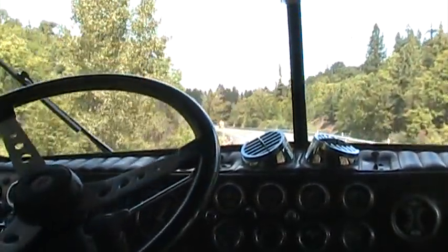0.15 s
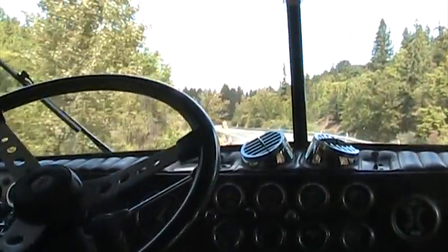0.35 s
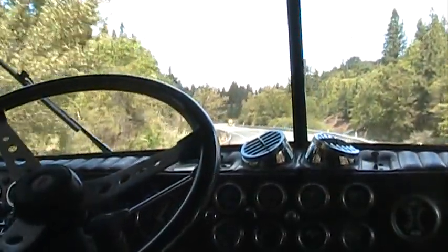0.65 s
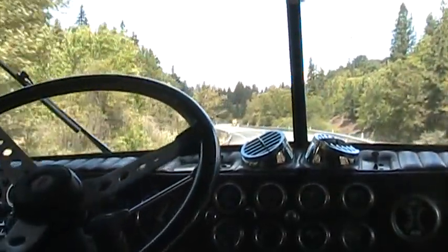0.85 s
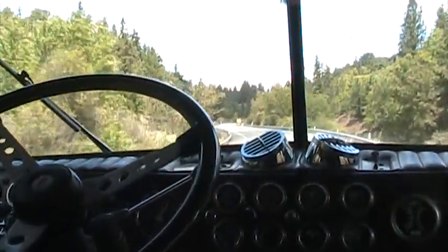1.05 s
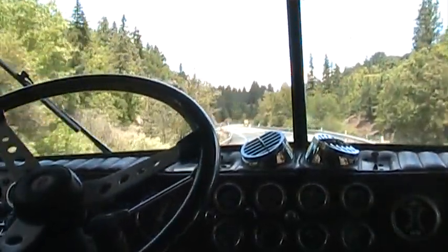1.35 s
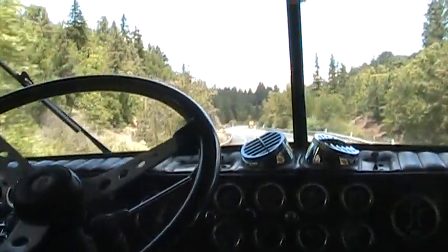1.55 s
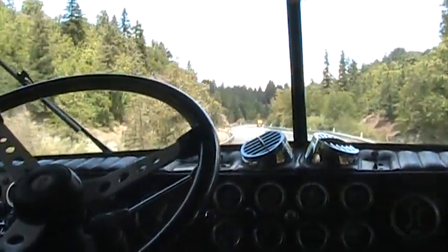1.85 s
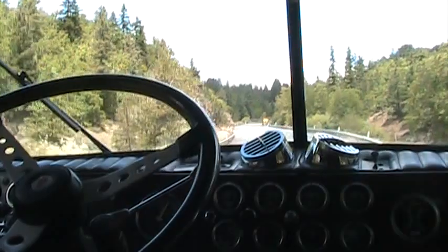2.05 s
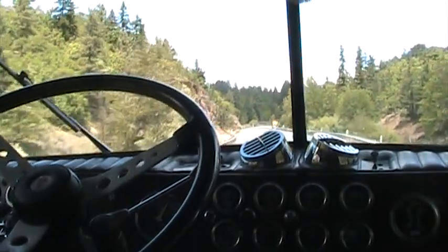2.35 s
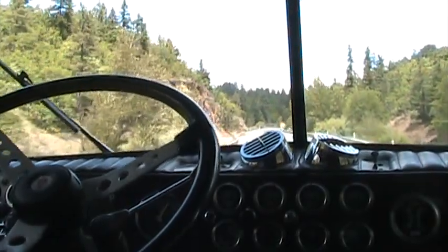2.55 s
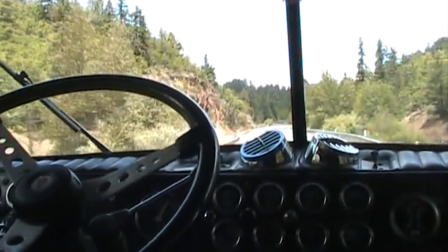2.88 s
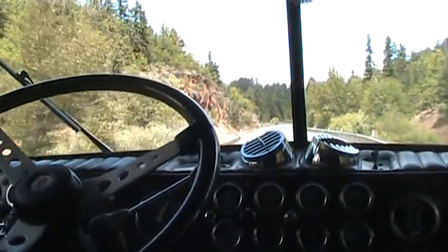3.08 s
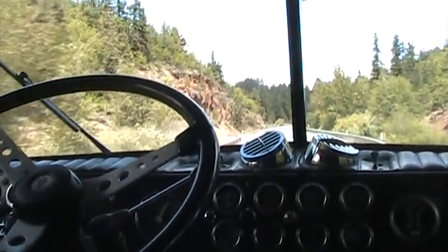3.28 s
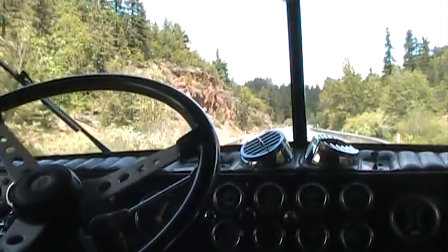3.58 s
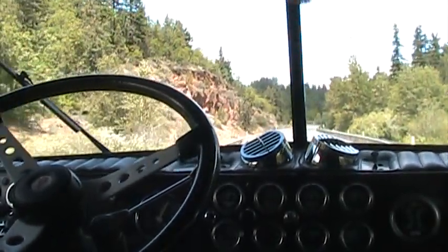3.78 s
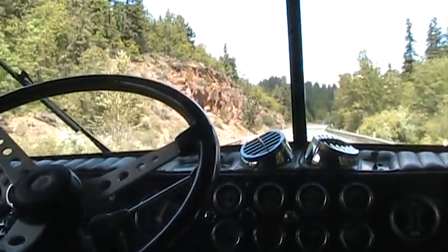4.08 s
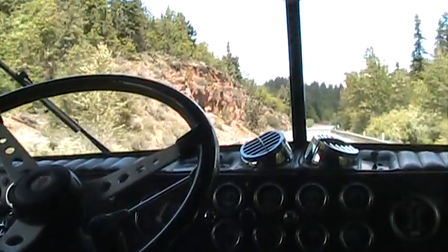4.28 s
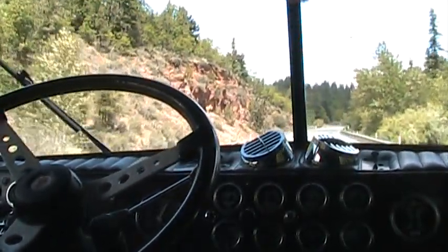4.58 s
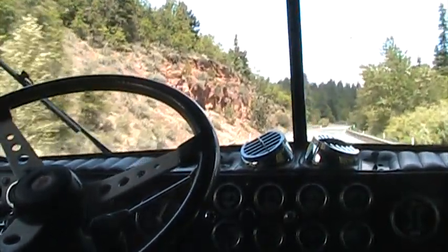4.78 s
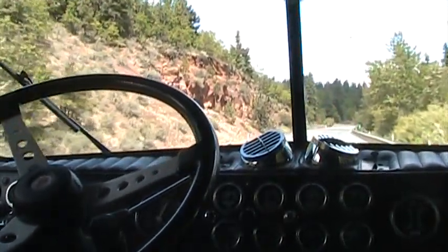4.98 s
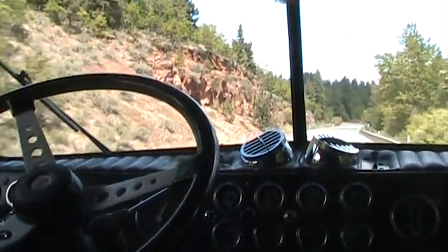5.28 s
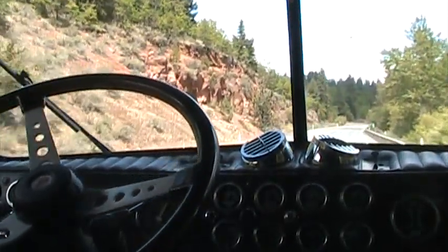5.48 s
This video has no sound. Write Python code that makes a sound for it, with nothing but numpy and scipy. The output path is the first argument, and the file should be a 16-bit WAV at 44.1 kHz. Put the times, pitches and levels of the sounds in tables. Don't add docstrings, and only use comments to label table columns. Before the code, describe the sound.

A heavy, buzzing diesel hum fills a moving truck cab as it climbs, with low rumble, airy hiss and constant small rattles.

```python
import sys
import numpy as np
from scipy import signal
from scipy.io import wavfile
from scipy.ndimage import uniform_filter1d

SR = 44100
rng = np.random.default_rng(int(sys.argv[2]) if len(sys.argv) > 2 else 0)


def voltage_ratio(decibels):
    exponent = np.asarray(decibels, float) / 20
    return 10 ** exponent


def to_wav(sig):
    pcm = np.clip(np.atleast_2d(sig), -1, 1) * 32767
    pcm = np.round(pcm).astype(np.int16)
    wavfile.write(sys.argv[1], SR, pcm.T)


N = 248283

# order [per crank turn], light_load_db, heavy_load_db
CRANK_ORDERS = [(1, -38, -40), (2, -40, -39), (3, -32, -35), (4, -36, -35), (5, -40, -42), (7, -31, -35),
                (8, -33, -30), (9, -30, -23.5), (10, -33, -30.5), (11, -36.5, -28), (12, -28, -28),
                (13, -37, -31), (14, -35, -35), (15, -31, -31), (16, -28, -29), (17, -30, -25),
                (18, -34, -36), (19, -46, -40), (20, -41, -40), (21, -34, -30.5), (22, -41, -50),
                (23, -34, -40), (24, -37, -33), (25, -47, -41), (26, -54, -42), (27, -45, -51),
                (28, -45, -55), (29, -53, -47), (30, -54, -43)]
# order [per crank turn], light_load_db, heavy_load_db
GEAR_ORDERS = [(24.5, -41, -47), (33.2, -57.5, -47), (34, -51, -55), (36, -48, -50), (42, -52, -54),
               (43, -52, -49), (44.5, -57.5, -47), (46, -49, -50), (49.9, -58, -53), (51, -49, -53),
               (52, -52, -51), (60, -55, -57.5), (78, -58, -56)]
# frequency_hz, density_db [dB per Hz]
HISS_SPECTRUM = [(400, -39.5), (900, -1), (1120, -1.5), (1260, -9), (1430, -2.5), (1700, -6.5), (2230, -8),
                 (2910, -12), (5040, -17), (6030, -21), (9610, -23.5), (11500, -31.5), (13500, -41.5),
                 (15700, -49)]
# frequency_hz, left_minus_right_db
PORT_BALANCE = [(60, -4), (130, -2), (290, -0.5), (640, -1), (1410, 2.5), (3100, 1.0), (6820, 0.0),
                (15000, 0.5)]
# frequency_hz, lead [radians]
PORT_LEAD = [(30, .45), (200, 0.22), (400, 0.38), (800, 0.042), (1500, 0.3), (4000, 0)]
CYLINDERS = 6
THIN = 6


def evened(x):
    return x / np.sqrt(np.mean(x ** 2) + 1e-20)


def read(points, hz):
    f, value = np.transpose(points)
    return np.interp(np.log(hz + 1), np.log(f + 1), value)


def drift(t, top_hz, count):
    hz = np.geomspace(top_hz / 20, top_hz, 16)[:, None]
    rows = []
    for chance in rng.random((count, 16, 2)):
        detuned_hz = hz * (1 + 0.2117 * chance[:, :1])
        sines = np.sin(2 * np.pi * (detuned_hz * t + chance[:, 1:]))
        rows.append(evened((sines / hz ** 0.38).sum(0)))
    return np.array(rows)


def tone(phase, hz, gain, lean_db=0):
    side = np.array([[.5], [-.5]])
    balance = voltage_ratio(side * (read(PORT_BALANCE, hz) + lean_db))
    return np.sqrt(2) * gain * balance * np.cos(phase + side * read(PORT_LEAD, hz))


def noise(spectrum, size, patchy_db, flicker_db, flicker_s, level_db):
    # frequency_hz, coherence [-1 to 1]
    coherence = [(30, .95), (130, .98), (640, .96), (1000, .7), (2000, .7), (4500, .68), (6800, .4),
                 (9000, -.25), (15000, -.2)]
    hop = size // 4
    frames, hz = N // hop + 5, np.fft.rfftfreq(size, 1 / SR)
    a, b, c, d, patches = rng.standard_normal((frames, len(hz), 5)).T
    patches = uniform_filter1d(patches, size=size // 64, axis=0)
    patches = evened(uniform_filter1d(patches, size=8, axis=1))
    flicker = drift(np.arange(frames) * hop / SR, 1 / flicker_s, count=1)
    same = np.clip(read(coherence, hz), -1, 1)[:, None]
    left = a + 1j * b
    right = same * left + np.sqrt(1 - same ** 2) * (c + 1j * d)
    z = np.array([left, right])
    side = np.array([.5, -.5])[:, None, None]
    z *= voltage_ratio(side * read(PORT_BALANCE, hz)[:, None]) * np.exp(1j * side * read(PORT_LEAD, hz)[:, None])
    z *= voltage_ratio(read(spectrum, hz)[:, None] + patchy_db * patches + flicker_db * flicker)
    sound = signal.istft(z, nperseg=size, noverlap=size - hop)[1][:, :N]
    return voltage_ratio(level_db) * evened(sound)


def suspension_rumble():
    # frequency_hz, density_db [dB per Hz]
    thumps = [(12, -14.5), (24, 14), (42, 9.5), (58, 6.5), (80, -28.5), (200, -120)]
    return noise(thumps, size=2048, patchy_db=1.0, flicker_db=2.5, flicker_s=.15, level_db=-36.5)


def body_roar():
    # frequency_hz, density_db [dB per Hz]
    body = [(15, -48.5), (28, -54), (45, -46), (75, -50), (125, -43), (165, -45.5), (210, -41.5),
            (330, -43), (450, -45), (790, -46.5), (900, -59.5), (1150, -59), (1400, -93.5), (3000, -140)]
    return noise(body, size=4096, patchy_db=1.5, flicker_db=.8, flicker_s=.1, level_db=-26)


def wind_hiss(t):
    # peak_s, rise_db
    gusts = [
        (.02, 2),
        (1.33, 3),
        (2.83, 2),
        (4.4, 0.5),
        (4.75, 1),
    ]
    gust_s = 0.037
    gust_db = sum(db * np.exp(-((t - at) / gust_s) ** 2) for at, db in gusts)
    hiss = noise(HISS_SPECTRUM, size=512, patchy_db=1.0, flicker_db=0.5, flicker_s=0.038, level_db=-34)
    return voltage_ratio(gust_db) * hiss


def road_and_wind():
    t = np.arange(N) / SR
    rise_db_per_s = 0.46
    swell = voltage_ratio(rise_db_per_s * (t - t.mean()))
    return swell * (body_roar() + wind_hiss(t)) + suspension_rumble()


def mount_squeak(start_s, length_s, hz, db):
    u = (np.arange(N) / SR - start_s) / length_s
    swell = np.clip(np.sin(np.pi * np.clip(u, 0, 1)) * 2, 0, 1)
    stutter = 1 - .5 * np.exp(-((u - .5) / .1) ** 2)
    return tone(2 * np.pi * hz * length_s * u, hz, voltage_ratio(db) * swell * stutter)


def ring(modes):
    t = np.arange(400) / SR
    x = 0
    for hz, width_hz, db in modes:
        x = x + voltage_ratio(db) * np.sin(2 * np.pi * hz * t) * np.exp(-np.pi * width_hz * t)
    return x / abs(x).max()


def burst(hz_lo, hz_hi, modes, fade_s, count):
    t = np.arange(500) / SR
    touches = rng.standard_normal((count, 2, 500)) * (rng.random((count, 1, 500)) < .3)
    touches *= np.exp(-t / fade_s) + voltage_ratio(-12) * np.exp(-t / .004)
    x = signal.oaconvolve(touches, ring(modes)[None, None], axes=2)
    x = signal.sosfilt(signal.butter(2, [hz_lo, hz_hi], "band", fs=SR, output="sos"), x)
    return x / abs(x).max(axis=2, keepdims=True)


def contacts():
    # start_s, peak_db, rebound_after_ms
    rattles = [(.2261, -34.5, 8.1), (.2999, -33.5, 4.6), (.4003, -35, 7.7), (.445, -32, 5.5),
               (.9474, -33.5, 3.2), (1.1784, -32.5, 3.5), (1.7894, -33, 6.1), (2.3241, -32.5, 7.5),
               (2.4412, -31.5, 3.6), (2.5636, -29.5, 4.4), (2.7002, -32.5, 11.6), (2.901, -31.5, 13),
               (3.2792, -31.5, 5.8), (3.5335, -39, 9.2), (4.0331, -35.5, 15.5), (4.6524, -35.5, 3.5),
               (4.8203, -29, 5.4), (4.9913, -33.5, 6.5), (5.1795, -35.5, 4.5), (5.1989, -34.5, 3.9),
               (5.2271, -34, 7.7), (5.2936, -39, 5.2), (5.4031, -35.5, 6.1), (5.504, -33, 10.5),
               (5.6026, -34, 8.6)]
    # start_s, bright_peak_db, dull_relative_db
    taps = [(.0505, -45, 9), (.9275, -32, 2), (.9695, -38, 2.5), (1.0413, -37, 4), (1.1077, -33, -4),
            (1.3628, -34, -6), (1.4361, -34.5, 5.5), (1.4934, -29, 3), (1.5667, -31.5, -7), (1.638, -34, 1),
            (1.9689, -35.5, 5), (2.104, -34.5, 2), (2.4871, -31.5, 5), (2.5831, -32, 0), (2.7427, -32.5, 7),
            (3.1441, -37.5, 1), (3.1918, -30.5, 4.5), (3.3265, -39.5, 1), (3.3936, -36, 2.5),
            (3.562, -34.5, -1.5), (3.577, -35, 8), (3.6581, -33, 7.5), (3.6849, -34, 8), (3.8787, -35, -1),
            (4.2367, -37, 6), (4.3891, -35, 4), (4.5131, -37.5, 4), (5.0717, -37, 5), (5.1162, -32.5, 0),
            (5.4672, -30, 3.5)]
    chance = rng.random((N, 3))
    vibration = drift(np.arange(0, N, 256) / SR, 60.0, count=1)[0]
    shake = voltage_ratio(4.0 * np.repeat(vibration, 256)[:N])
    at = np.flatnonzero(chance[:, 0] < 95 * shake / SR)
    faint = np.c_[at / SR, -51 + 13 * chance[at, 1] ** 3, 3 + 10 * (chance[at, 2] - .5)]
    first = [(s, db, 2.5) for s, db, _ in rattles]
    rebound = [(s + ms / 1000, db + 0.5, 1.5) for s, db, ms in rattles]
    return first + rebound + list(taps) + list(faint)


def trim():
    # frequency_hz, width_hz, level_db
    ring_modes = [(8300, 2500, -4.5), (10000, 1500, 15), (13500, 3300, -6.5)]
    # frequency_hz, width_hz, level_db
    knock_modes = [(3760, 1400, -3), (5000, 1900, 5.5), (7000, 1300, -1)]
    touches = contacts()
    bright = burst(7000, 16000, ring_modes, .0007, count=40)
    dull = burst(2500, 8000, knock_modes, 0.00097, count=40)
    out = np.zeros((2, N + 1800))
    for k, (s, db, dull_db) in enumerate(touches):
        (a, b), (c, d) = bright[k % len(bright)], dull[k % len(dull)]
        shine = np.array([a, -.3 * a + .95 * b])
        knock = np.array([c, c + 0.31 * d])
        ports = shine + voltage_ratio(dull_db - 0.5) * knock
        pan_db = 2 - .45 * dull_db
        i = round(s * SR)
        out[:, i:i + len(a)] += voltage_ratio(db + 2.0 + np.array([[.5], [-.5]]) * pan_db) * ports
    return out[:, :N]


def valve_clatter(t, crank, crank_hz):
    taken = np.round([row[0] for row in CRANK_ORDERS + GEAR_ORDERS])
    orders = np.setdiff1d(np.arange(31, 90), taken)
    out, coarse = 0, t[::64]
    waver = drift(coarse, 1.5, count=len(orders))
    chance = rng.random((len(orders), 3))
    for order, w, (a, b, c) in zip(orders, waver, chance):
        hz = order * crank_hz
        db = -52 + read(HISS_SPECTRUM, hz) + 4 * (a - .5) + 3.6 * w
        gain = np.interp(t, coarse, voltage_ratio(db))
        out = out + tone(order * crank + 2 * np.pi * b, hz, gain, lean_db=6 * (c - .5))
    return out


def panel_gain_db(hz):
    # centre_hz, width_hz, gain_db
    panels = [(321.5, 1, -3), (386, 2, -3.5), (447.1, .4, -9), (643, 6, -7), (673, 2.5, -5), (734.3, 1, -5),
              (775, 1.5, -13), (1105.5, 3, 8.5), (1152, 3, -12), (1161, 5, 4), (1381, 8, -14),
              (1640, 14, 6), (2534, 12, 11)]
    near = [row for row in panels if abs(hz.mean() - row[0]) < 60]
    return sum(db * np.exp(-.5 * ((hz - at) / width_hz) ** 2) for at, width_hz, db in near)


def crank_orders(t, crank, crank_hz, load):
    orders = CRANK_ORDERS + GEAR_ORDERS
    coarse = t[::64]
    waver = drift(coarse, 5.0, count=len(orders))
    slip = drift(coarse, 2.7, count=len(orders))
    scatter = rng.uniform(-.5, 0, len(orders))
    out = 0
    for k, (order, light_db, heavy_db) in enumerate(orders):
        hz = order * crank_hz
        loose = 1 + .01 * order
        db = light_db + (heavy_db - light_db) * load
        db = db + 1.05 * loose * np.interp(t, coarse, waver[k]) + panel_gain_db(hz)
        away = order - CYLINDERS
        spread = 1.448 * away ** 2 - .38 * away + scatter[k]
        phase = order * crank + spread + .1 * loose * np.interp(t, coarse, slip[k])
        out = out + tone(phase, hz.mean(), voltage_ratio(db))
    return out


def firing_boom(t, crank, crank_hz, load):
    # peak_s, depth_db
    bumps = [
        (4.67, 3),
        (4.84, 1.5),
        (5.05, 2.5),
        (5.41, 4),
    ]
    bump_s = 0.022
    choke_db = sum(db * np.exp(-((t - at) / bump_s) ** 2) for at, db in bumps)
    return tone(CYLINDERS * crank, CYLINDERS * crank_hz.mean(), voltage_ratio(-12.5 - 2 * load - choke_db))


def blower(crank, crank_hz, load):
    order = 12.3136
    gain = voltage_ratio(-30 + 1.9 * load ** 2)
    return tone(order * crank - 3.7, order * crank_hz.mean(), gain, lean_db=2.5)


def engine():
    # time_s, firing_hz, load [0-1.6]
    climb = [
        (0, 195.8, .1),
        (.8, 195.1, -.1),
        (1.6, 194.4, 0),
        (2.4, 193.7, .1),
        (3.2, 192.6, .25),
        (3.6, 192.25, .3),
        (4.0, 191.9, .55),
        (4.8, 191.4, .95),
        (5.63, 191.2, 1.6),
    ]
    t = np.arange(0, N + THIN, THIN) / SR
    s, *columns = np.transpose(climb)
    firing_hz, load = (np.interp(t, s, column) for column in columns)
    crank_hz = firing_hz / CYLINDERS
    crank = 2 * np.pi * np.cumsum(crank_hz) * THIN / SR + .035
    out = firing_boom(t, crank, crank_hz, load) + blower(crank, crank_hz, load)
    out += crank_orders(t, crank, crank_hz, load)
    out += valve_clatter(t, crank, crank_hz.mean())
    return signal.resample_poly(out, THIN, 1, axis=1, window=("kaiser", 10), padtype="line")[:, :N]


def scene():
    background = road_and_wind()
    squeak = mount_squeak(start_s=4.368, length_s=.04, hz=3420, db=-44)
    return background + squeak + trim() + engine()


def low_pass(x):
    return signal.sosfilt(signal.butter(12, 15840, fs=SR, output="sos"), x)


def record(dry):
    return low_pass(dry)


dry = scene()
out = record(dry)
to_wav(out)
```